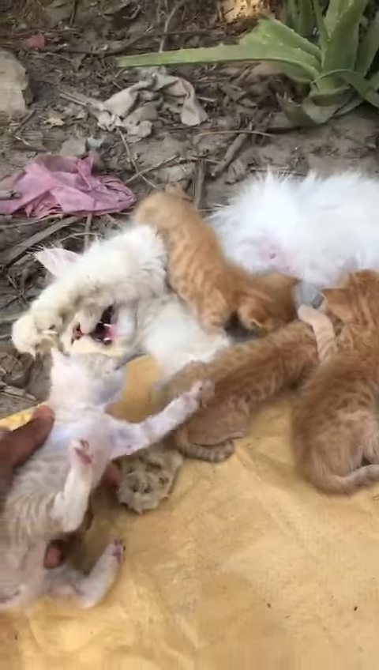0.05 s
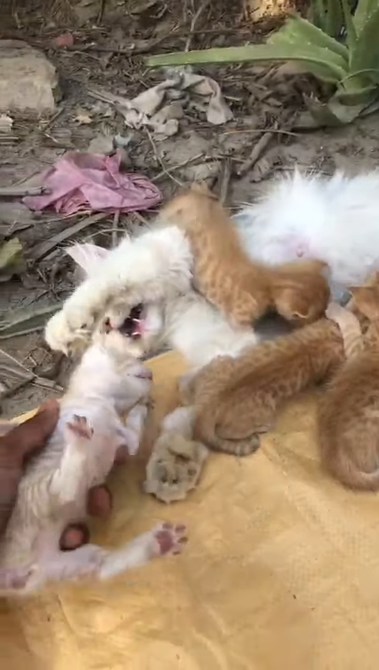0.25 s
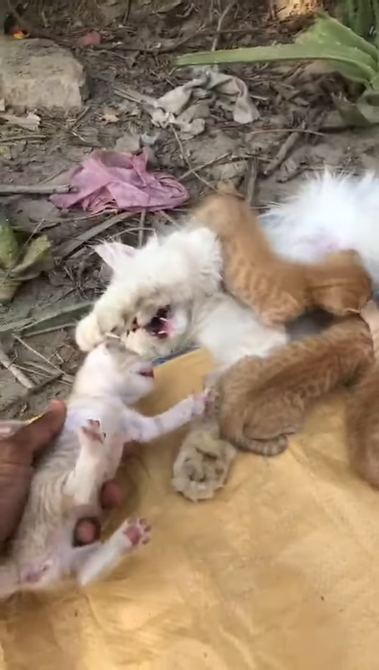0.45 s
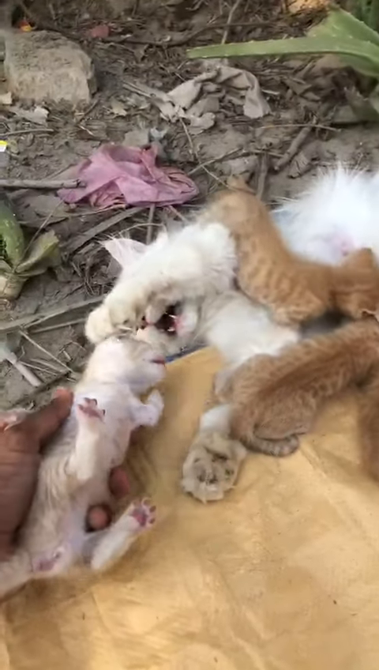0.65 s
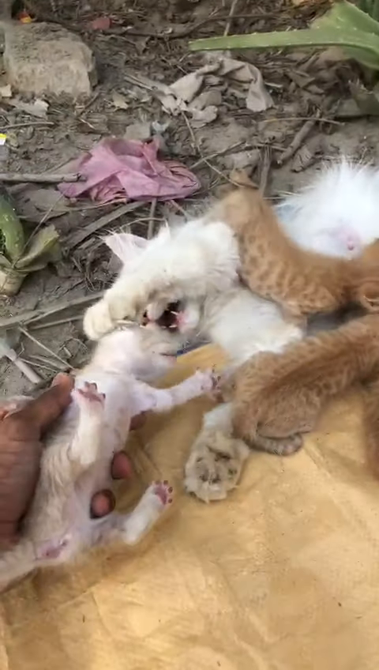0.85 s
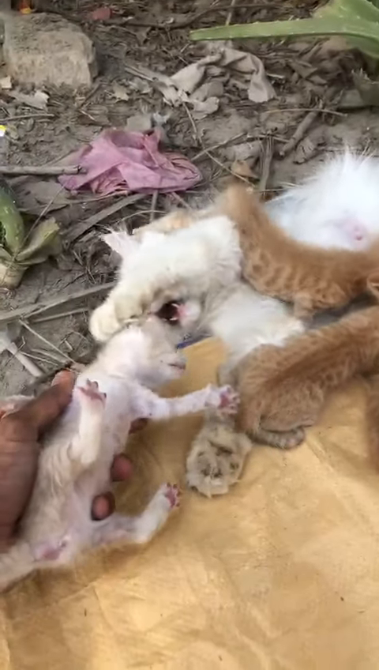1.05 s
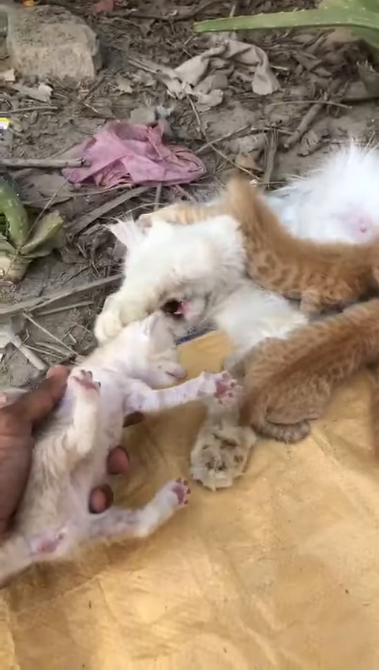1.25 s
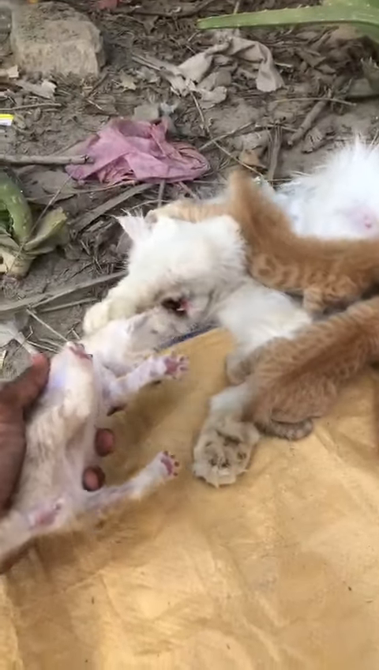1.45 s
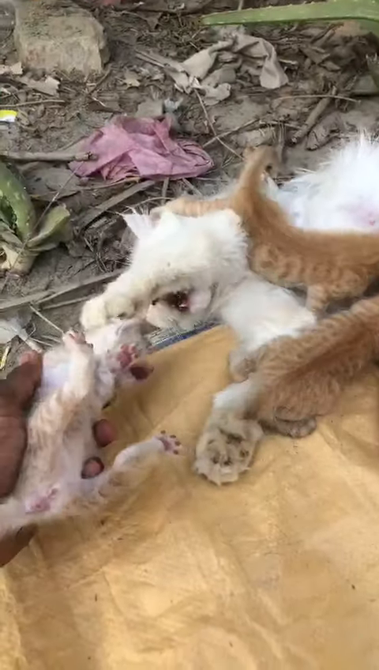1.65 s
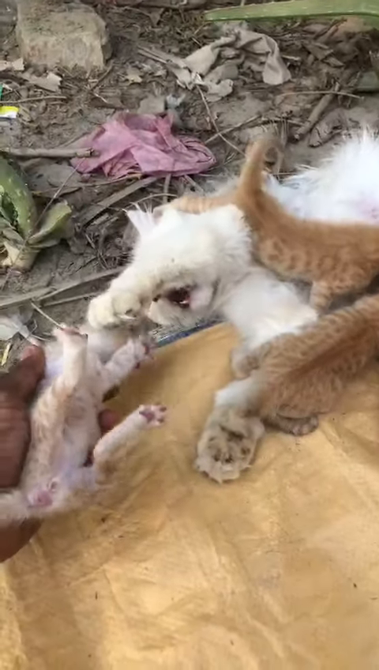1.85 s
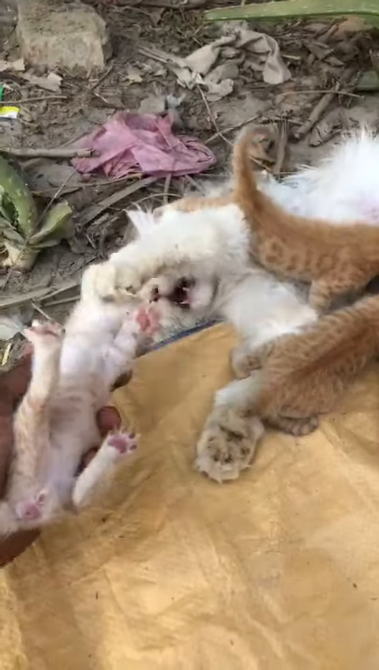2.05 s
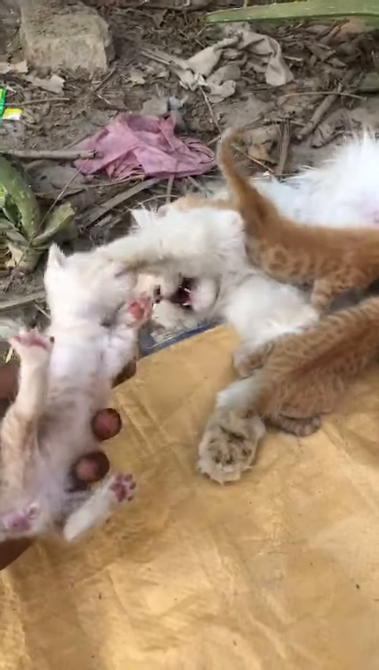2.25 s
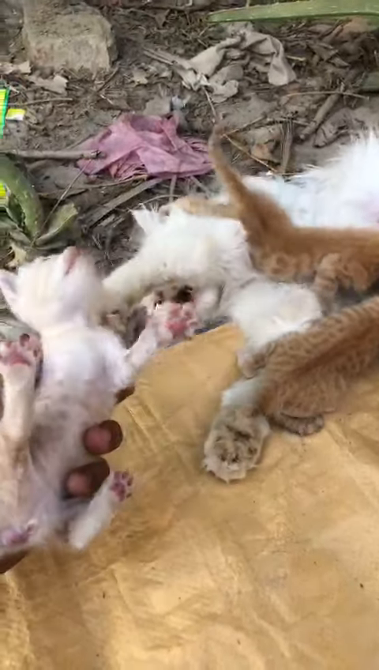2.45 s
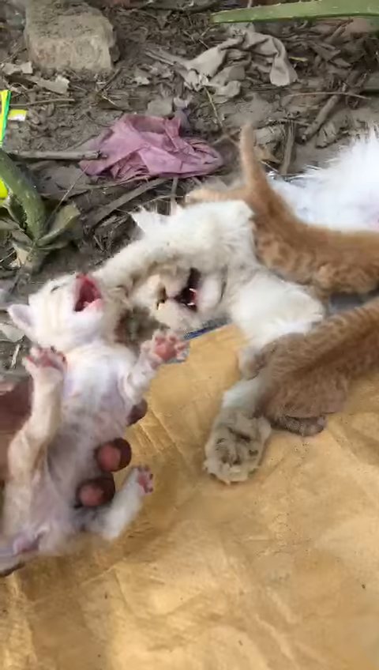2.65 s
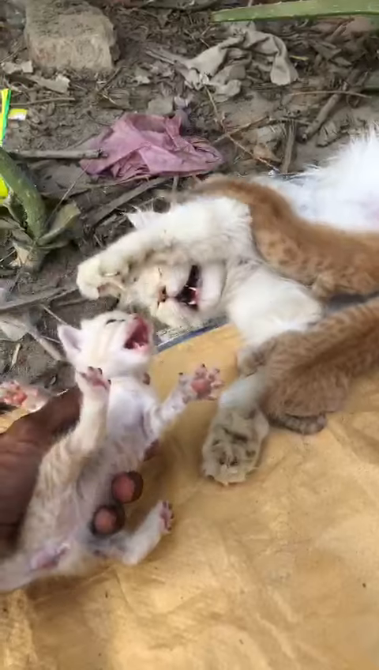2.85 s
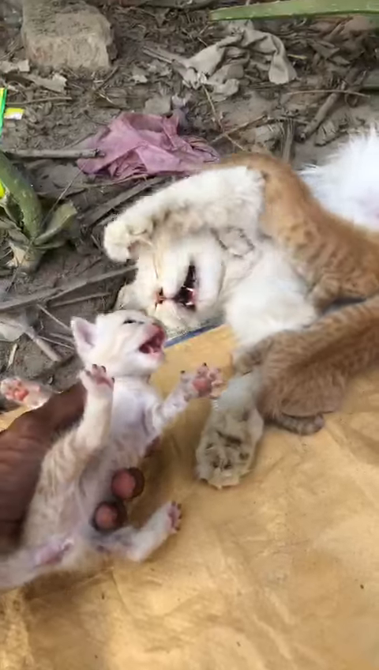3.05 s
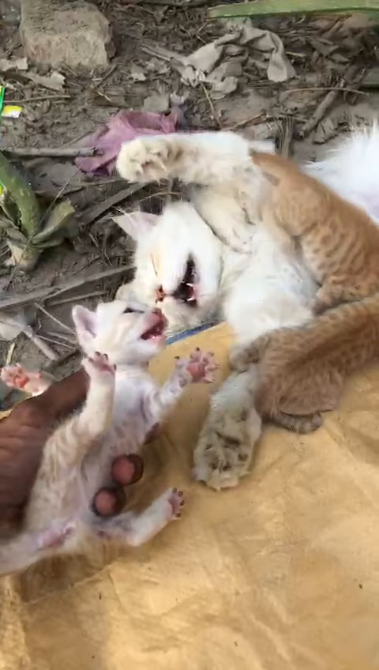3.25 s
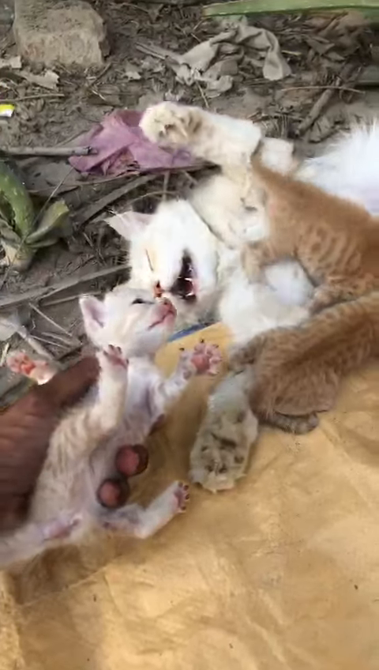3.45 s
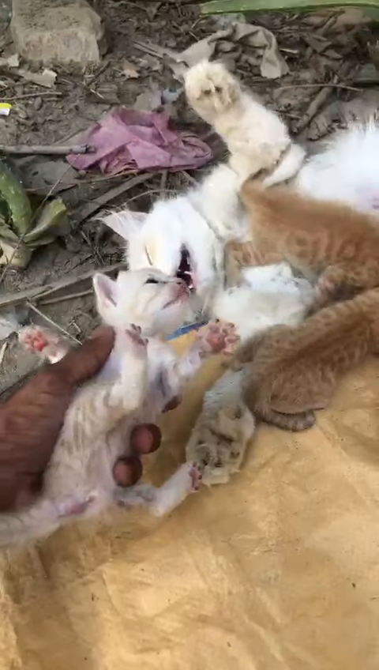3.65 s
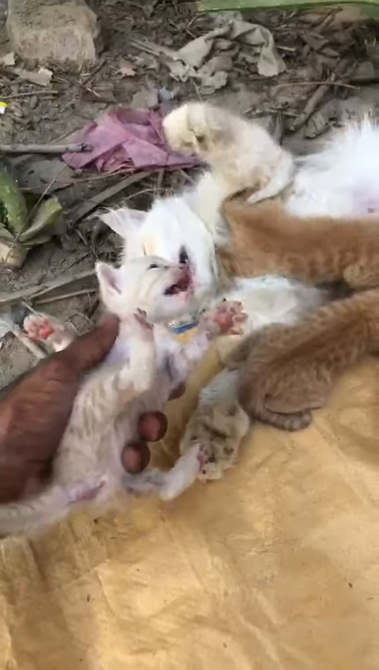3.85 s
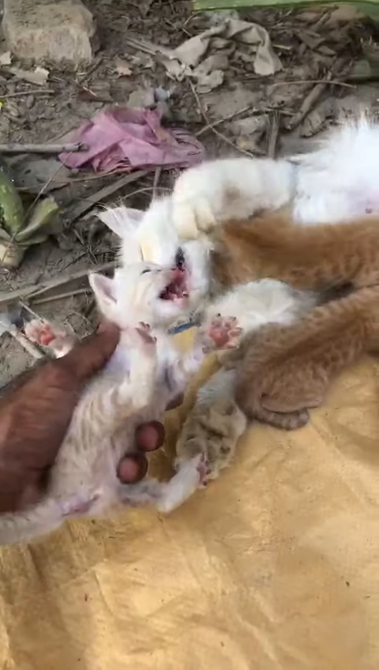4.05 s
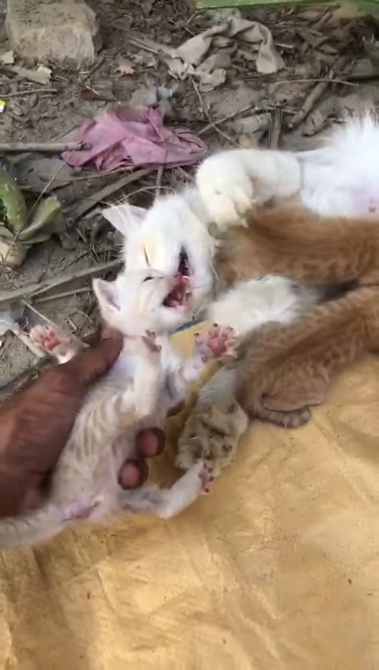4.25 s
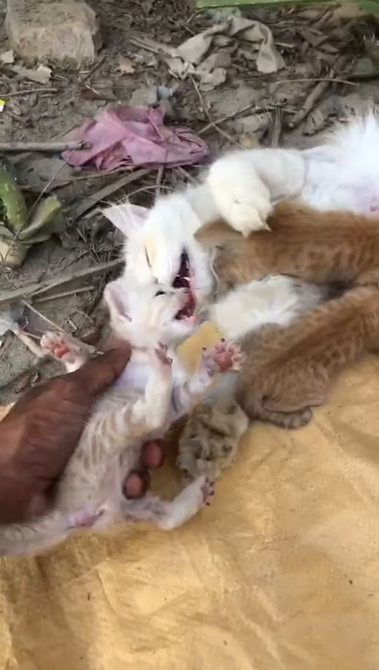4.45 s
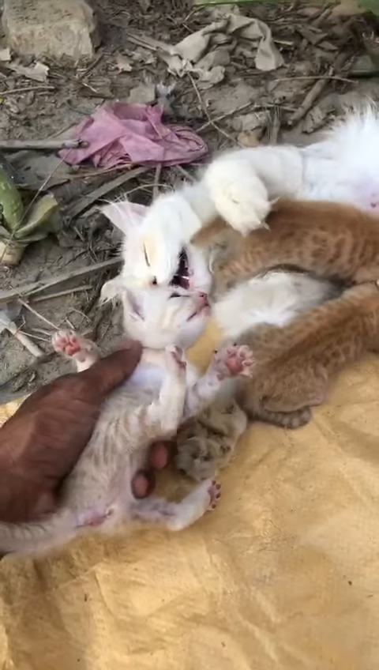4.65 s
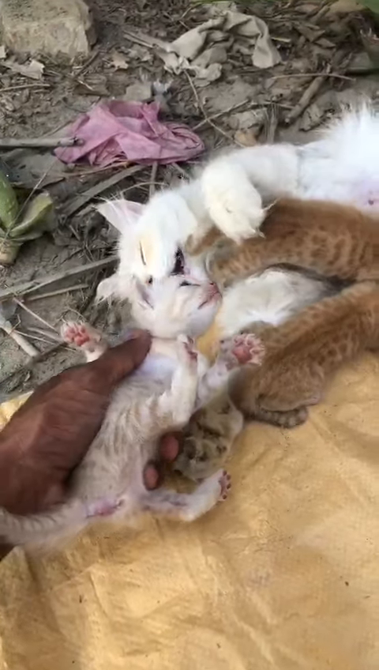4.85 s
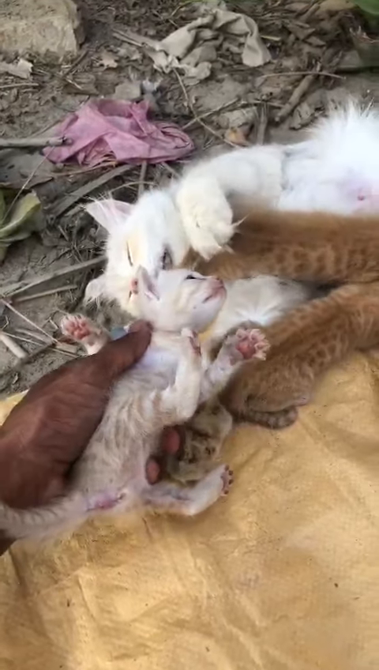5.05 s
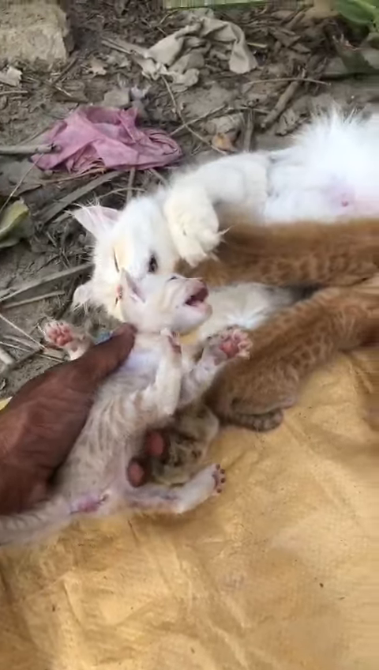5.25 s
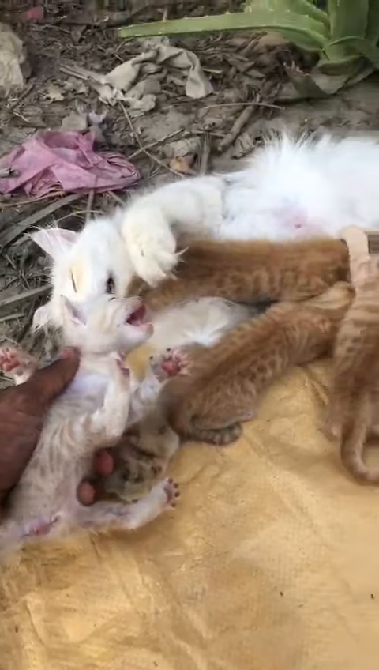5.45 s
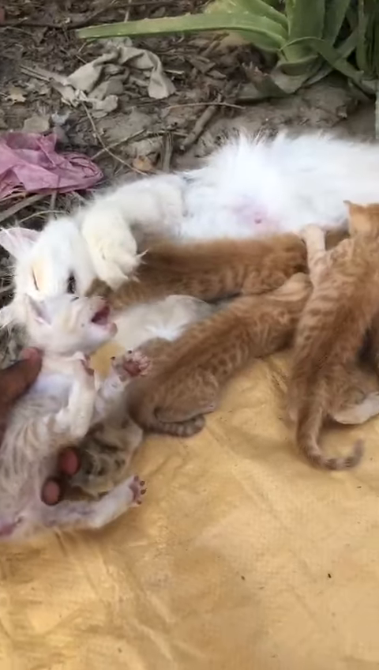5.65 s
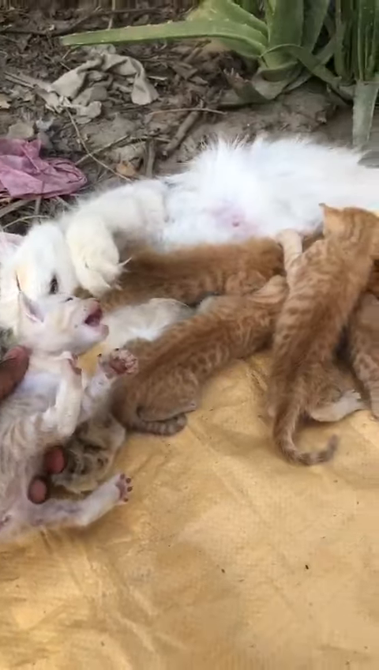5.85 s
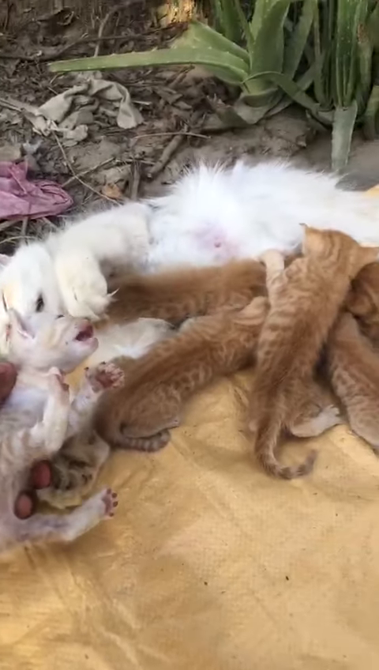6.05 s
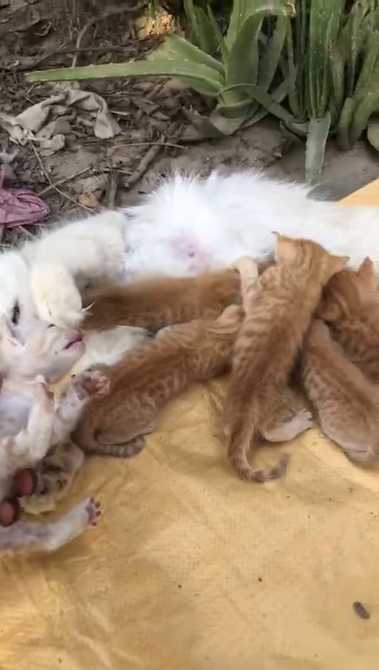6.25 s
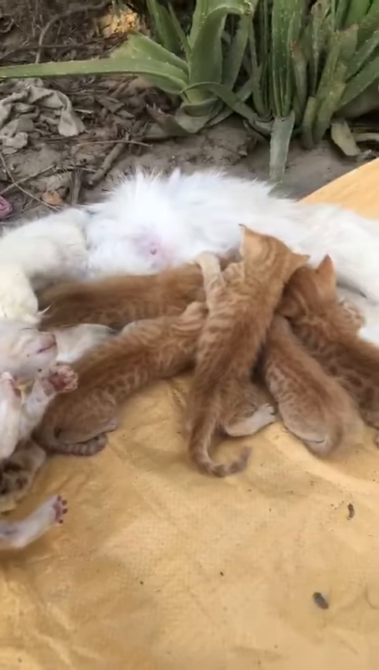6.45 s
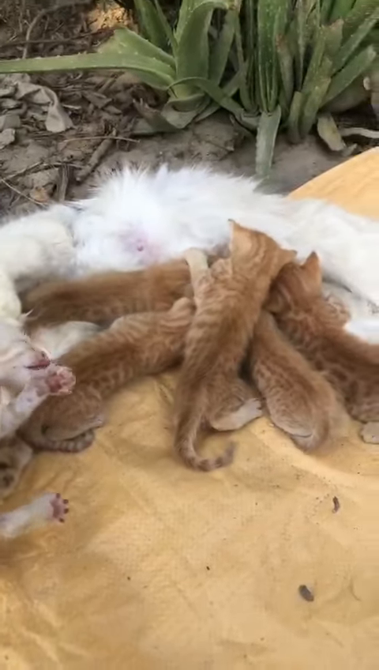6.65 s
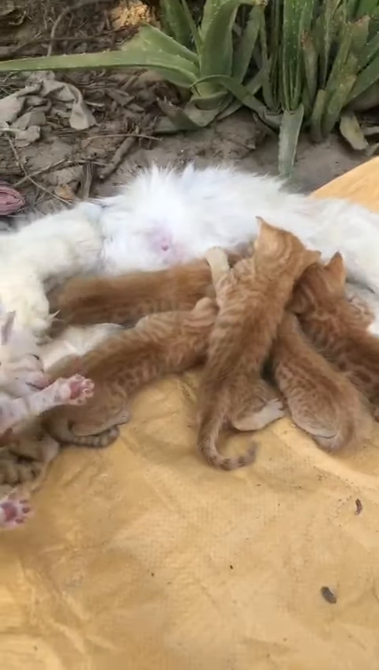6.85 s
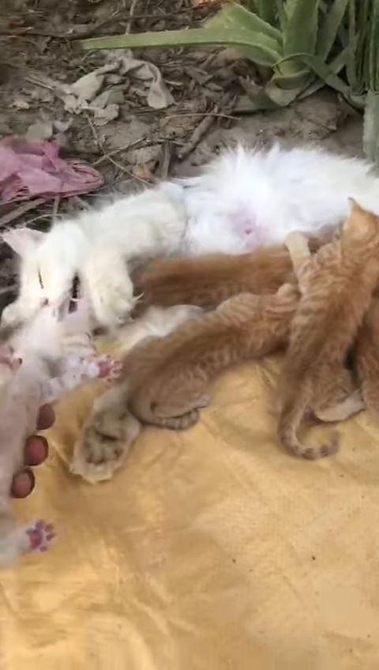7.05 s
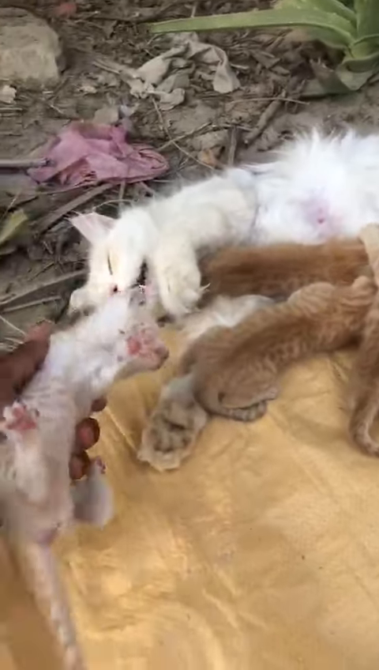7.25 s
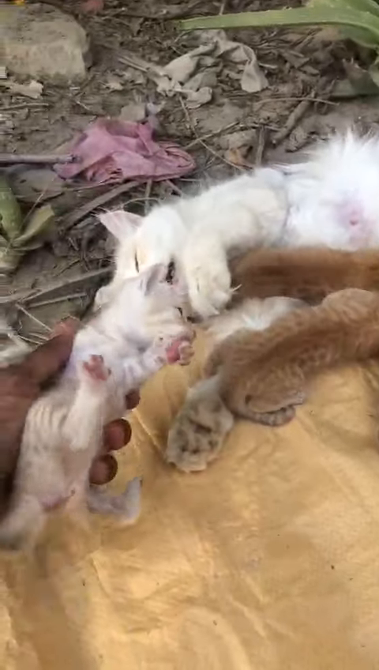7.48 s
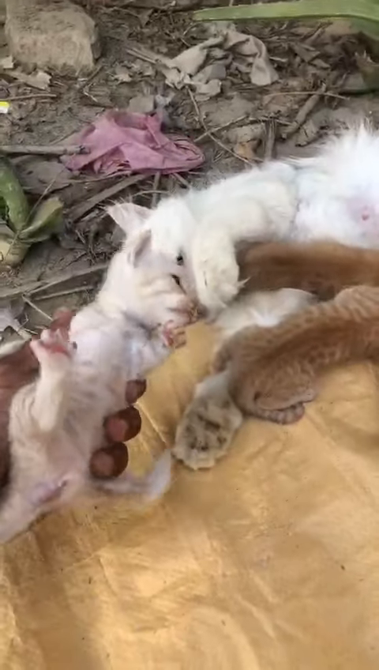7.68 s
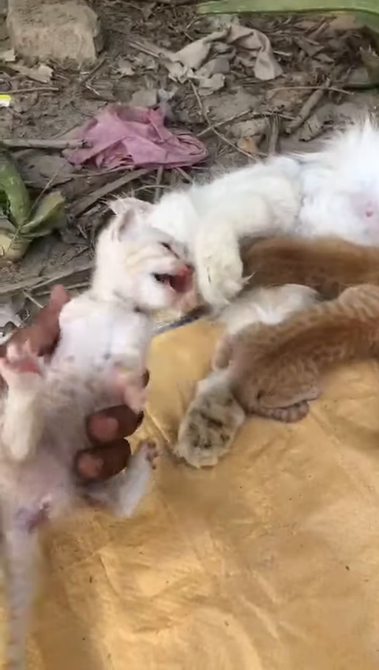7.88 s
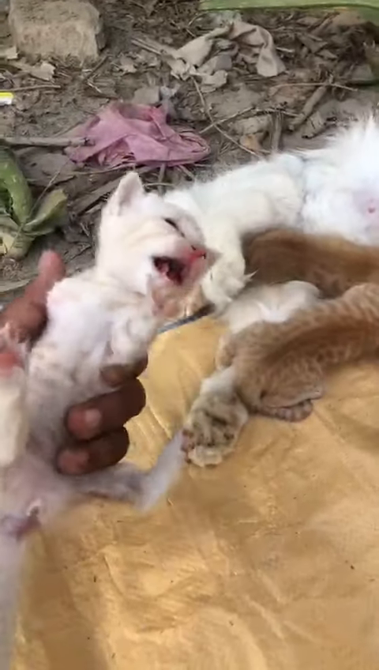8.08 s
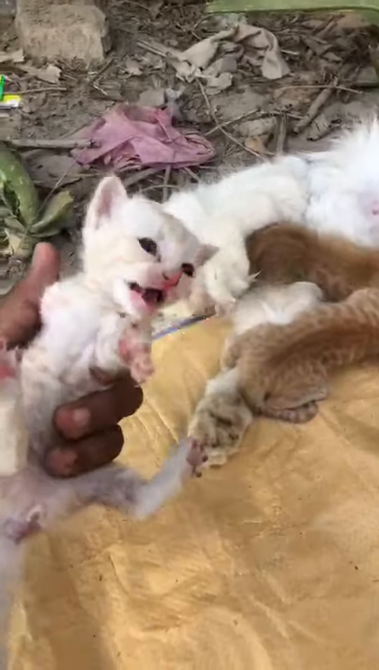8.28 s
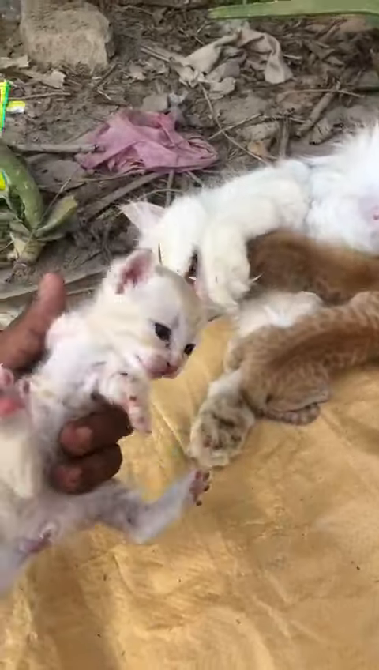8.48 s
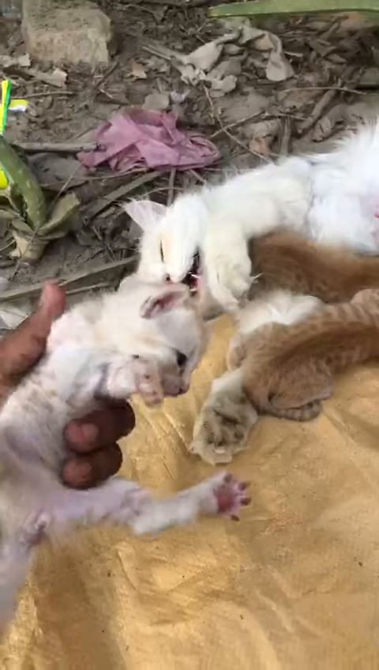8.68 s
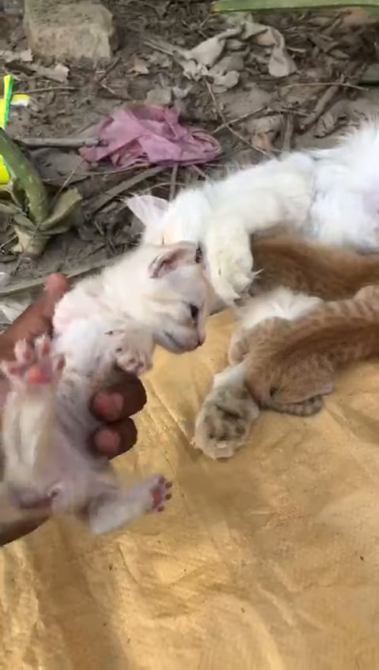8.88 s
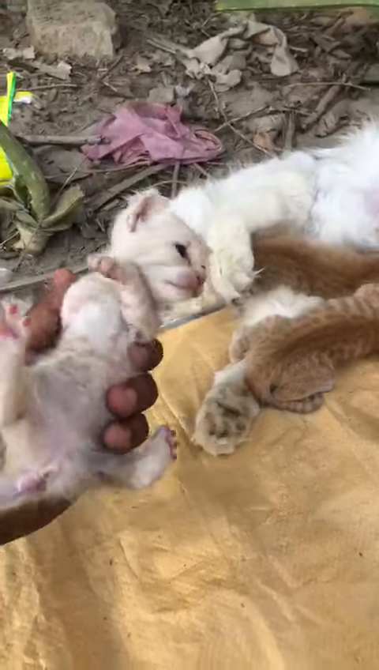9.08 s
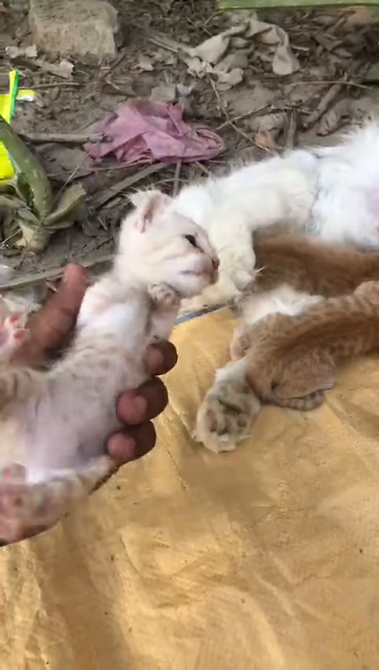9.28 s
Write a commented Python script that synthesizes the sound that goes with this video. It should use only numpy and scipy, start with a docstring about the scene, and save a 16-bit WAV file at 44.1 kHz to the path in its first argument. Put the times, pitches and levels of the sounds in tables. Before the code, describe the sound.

Short shrill kitten cries with pauses between, a small gulp, a litter mate's thin peep, light ticks and rustles in a quiet yard.

```python
"""A very young kitten, held in a hand outdoors, mews six times: arched harmonic tones under one mouth resonance.
The first three mews lead to a brief gulp-like blip, a gliding tone; in places the voice splits and rasps.
The fourth and fifth follow, a litter mate peeping thinly over the fifth's end; after a gap comes the sixth.
Throughout: shaped-noise air and a low sine hum; now and then damped ticks, small squeaks, noise-band
rustles and spells of a far insect."""
import sys
import numpy as np
from scipy import signal
from scipy.fft import rfft, irfft, next_fast_len
from scipy.io import wavfile
from scipy.ndimage import uniform_filter1d

SR = 44100
rng = np.random.default_rng(int(sys.argv[2]) if len(sys.argv) > 2 else 0)


def master(y):
    """Save y as 16-bit WAV."""
    cut = np.clip(np.atleast_2d(y).T, -1, 1)
    pcm = np.round(cut * 32767)  # scale
    wavfile.write(sys.argv[1], SR, pcm.astype(np.int16))


N = 411012

# course of each mew: t/s, aimed pitch f/Hz, effort level/dB, mouth resonance f/Hz
MEW_1 = [(0.185, 1022, -2, 1660), (0.295, 1127, -4.5, 1880), (0.323, 1213, 0.1, 3060),
         (0.352, 1170, -7.5, 1460), (0.393, 1278, -0.6, 1800), (0.411, 1249, -0.94, 2370),
         (0.484, 1227, -1.0, 2420), (0.556, 1163, -1.6, 2370), (0.597, 1209, -1, 2030),
         (0.747, 1100, -2.5, 1850), (0.834, 1030, 0.4, 1400)]
MEW_2 = [(1.525, 1024, 2.9, 4700), (1.609, 1204, 1.03, 4400), (1.694, 1226, 1.1, 4070),
         (1.732, 1099, 1.73, 4145), (1.798, 1111, 1.46, 3870), (1.874, 1153, -0.22, 3390),
         (1.966, 1115, 0.16, 3380), (2.028, 1106, -0.58, 3090), (2.086, 1066, -1.2, 2830),
         (2.193, 1100, -0.73, 2400)]
MEW_3 = [(2.503, 1165, -0.5, 3340), (2.604, 1191, -0.2, 3800), (2.698, 1223, -0.5, 4510),
         (2.795, 1221, -0.2, 4070), (2.923, 1185, -1.0, 3600), (3.078, 1169, -1.49, 3510),
         (3.188, 1122, -1.15, 3300), (3.234, 1147, -2.5, 3380), (3.384, 1036, -2, 2530)]
MEW_4 = [(3.88, 1120, 1.2, 3370), (3.964, 1174, -0.5, 4230), (4.046, 1157, 0.0, 4200),
         (4.131, 1160, 0.38, 4080), (4.212, 1161, 0.42, 3900), (4.307, 1192, -0.8, 3810),
         (4.431, 1160, -1.26, 3450), (4.534, 1109, -2, 3010), (4.608, 952, -2.5, 2350)]
MEW_5 = [(5.2, 1097, 1.5, 2370), (5.256, 1192, -0.2, 2280), (5.27, 1257, 1, 4220), (5.45, 1163, -0.5, 4390),
         (5.57, 1170, -1.43, 4270), (5.723, 1177, -2, 4000), (5.906, 1109, -3.5, 3460),
         (6.06, 1056, -3.0, 2914), (6.208, 1002, -3, 2320), (6.326, 967, -0.85, 2070)]
MEW_6 = [(7.797, 1035, 1.3, 2110), (7.855, 1155, -2, 2560), (7.888, 1120, -3.5, 2600),
         (7.925, 1197, -1.8, 3770), (7.952, 1145, -1.33, 3760), (8.01, 1181, -.5, 3910),
         (8.077, 1155, -0.5, 3540), (8.104, 1112, 0.6, 3116), (8.262, 1117, 0.76, 3070),
         (8.37, 1103, 0.26, 2753), (8.45, 1055, -0.8, 2270), (8.562, 953, 1.36, 2500)]


def amp(db):
    """Decibels to gain."""
    return 10 ** (np.asarray(db) / 20)


def unit(x):
    """Scales to rms 1."""
    return x / np.sqrt(np.mean(x ** 2) + 1e-20)


def read(points, hz):
    """Interpolates a (f/Hz, value) spectrum on a log-frequency axis."""
    f, value = np.transpose(points)
    return np.interp(np.log(hz + 1), np.log(f), value)


def add(mix, start_s, sound):
    """Mixes a sound in at start_s."""
    part = mix[max(round(start_s * SR), 0):][:len(sound)]
    part += sound[:len(part)]


def noise(size, colour):
    """Noise of rms 1 whose spectrum follows the gain colour(Hz)."""
    padded = next_fast_len(size + 2048)
    spectrum = rfft(rng.standard_normal(padded)) * colour(np.fft.rfftfreq(padded, 1 / SR))
    return unit(irfft(spectrum, padded)[:size])


def wander(size, rate_hz):
    """Random motion of rms 1, slower than about rate_hz."""
    return noise(size, lambda f: np.exp(-(f / rate_hz) ** 2))


def band(size, hz, octaves):
    """Noise of rms 1 in a bell-shaped band on a log-frequency axis."""
    return noise(size, lambda f: np.exp(-.5 * (np.log2((f + 1) / hz) / octaves) ** 2))


def fade(t, start, end, edge_s):
    """A gate from start to end with smooth edges."""
    ramp = np.clip(np.minimum(t - start, end - t) / edge_s, 0, 1)
    return np.sin(np.pi / 2 * ramp) ** 2


def mew(course, level_db, slope_db, tense_s, relax_s, strain_jitter=0.051, shimmer_db=0.67, side_db=-47,
        breath_db=-36, slip_hz=100, fits_db=3, split_waver_db=3, sheen_db=-71, sheen_rise_s=0.078):
    """Harmonics of the folds; under strain they repeat only every third cycle, and turbulence joins in."""
    jitter = .0018  # share of pitch
    upper_side_db, hiss_db = -9.5, -4
    hiss_resonance = 0.38  # share of the mouth resonance's dB height that turbulence feels
    start, end = course[0][0], course[-1][0]
    t = np.arange(start, end, 1 / SR)
    size = len(t)
    glide_hz, effort_db, mouth_hz = gesture(t, course, tense_s, relax_s)

    side, rasp = break_shares(t, side_db, breath_db)
    side = side * amp(split_waver_db * wander(size, 35))
    rasp = rasp * amp(fits_db * wander(size, 60))  # the rasp comes in fits

    pitch_hz = uniform_filter1d(glide_hz, size=500, mode="nearest")
    unsteadiness = jitter * wander(size, 67) + strain_jitter * rasp * wander(size, 350)
    pitch_hz = pitch_hz * (1 + unsteadiness)
    phase = 2 * np.pi * np.cumsum(pitch_hz) / SR

    # a second motion of the folds locks to a third of the pitch, and slips when the voice rasps
    slow_hz = pitch_hz / 3
    slipping_hz = slow_hz + slip_hz * rasp * wander(size, 120)
    slow_phase = 2 * np.pi * np.cumsum(slipping_hz) / SR

    # each overtone gets side tones below and above, coloured by the mouth at their own frequency
    family = [(-0.0022, 0.97), (-1, side), (1, side * amp(upper_side_db))]  # (step/slow_hz, gain)
    tone = np.zeros(size)
    for k in range(1, 14):
        shimmer = amp(shimmer_db * np.sqrt(k / 2) * wander(size, 22))
        members = family if k > 1 else family[:1]
        for step, share in members:
            gain = voice_gain(k * glide_hz + step * slow_hz, glide_hz, slope_db, effort_db, mouth_hz)
            tone += share * shimmer * gain * np.cos(k * phase + step * slow_phase - k ** 2 / 2)

    # closing folds snap: a thin sheen of high harmonics, independent of effort
    sheen = np.zeros(size)
    for k in range(6, 11):
        sheen += amp(sheen_db + shimmer_db * wander(size, 22)) * np.sin(k * phase - k ** 2 / 2)
    sheen = sheen * fade(t, start, end + sheen_rise_s / 2, sheen_rise_s)

    # turbulence passes the same mouth and pulses with the slow motion of the folds
    hz, at_s, z = signal.stft(rng.standard_normal(size), SR, nperseg=256)
    frame_pitch, frame_effort, frame_mouth = [np.interp(at_s + start, t, c)
                                              for c in (glide_hz, effort_db, mouth_hz)]
    z = z * voice_gain(hz[:, None], frame_pitch, slope_db, frame_effort, frame_mouth, hiss_resonance)
    hiss = signal.istft(z, SR, nperseg=256)[1][:size]
    hiss = hiss * np.sqrt(SR / 2 / pitch_hz) * (1 + .5 * np.cos(slow_phase))

    voice = amp(level_db) * (np.sqrt(2) * tone + amp(hiss_db) * rasp * hiss) + np.sqrt(2) * sheen
    return start, voice * fade(t, start, end, 0.0043)


def gesture(t, course, tense_s, relax_s):
    """Slack folds are flat and weak: they tense up to the course and go slack at the end."""
    scoop, attack_db = .232, 9  # share of pitch and effort missing at the start
    drop, release_db = .251, 6  # the same at the end
    s, *columns = np.transpose(course)
    aim_hz, effort_db, mouth_hz = [np.interp(t, s, c) for c in columns]
    starting = np.exp((t[0] - t) / tense_s)
    ending = np.exp((t - t[-1]) / relax_s)
    pitch_hz = aim_hz * (1 - scoop * starting) * (1 - drop * ending)
    return pitch_hz, effort_db - attack_db * starting - release_db * ending, mouth_hz


def break_shares(t, side_db, breath_db, last_rasp_db=0, last_s=0.0204):
    """Gains of side tones and rasp: breaks rasp least in their middle; every mew rasps as it ends."""
    settle_db = 6  # for breaks of 0.17 s or more
    # voice breaks: start t/s, end t/s, side tone re harmonic level/dB, rasp before settling level/dB
    breaks = [(0.323, .344, -29, -4.5), (1.71, 1.728, -27.5, -20), (1.75, 1.83, -37, -38),
              (2.837, 2.93, -12, -11), (2.918, 3.097, -6.5, -15.5), (3.134, 3.173, -25, -17),
              (4.017, 4.09, -9.5, -6.5), (4.058, 4.297, -8, -16.5), (5.429, 5.56, -4.5, -13),
              (8.102, 8.115, -43.5, -19.5), (8.377, 8.462, -29, -23), (8.458, 8.54, -29, -17.5)]
    side = np.full(len(t), amp(side_db))
    rasp = np.full(len(t), amp(breath_db))
    for start, end, split_db, rasp_db in breaks:
        inside = (t >= start) & (t < end)
        middle = np.sin(np.pi * (t[inside] - start) / (end - start)) ** 2
        side[inside] = amp(split_db)
        rasp[inside] = amp(rasp_db - settle_db * middle * min((end - start) / 0.17, 1))
    rasp[t > t[-1] - last_s] = amp(last_rasp_db)
    return uniform_filter1d(np.array([side, rasp]), size=400, axis=1)


def voice_gain(hz, pitch_hz, slope_db, effort_db, mouth_hz, resonance=1):
    """Gain of the voice at hz: slope of the folds, mouth resonance and throat."""
    mouth_peak_db, mouth_width_hz = 26.5, 316
    brighten, top_harmonic = 3.03, 8.1  # dB per octave per dB of effort; slope stops at top_harmonic
    # fixed colour of the throat: f/Hz, level/dB
    throat = [(400, -14), (800, 0), (1200, 0), (2300, 5.4), (3400, 2.5), (4600, 2.6), (5600, 2),
              (7000, 2.5), (9000, -9), (10500, -9), (11700, -15), (13000, -24)]
    octaves = np.log2(np.clip(hz / pitch_hz, 1, top_harmonic))
    folds_db = effort_db + (slope_db + brighten * effort_db) * octaves
    mouth_db = resonance * mouth_peak_db / np.hypot(1, (hz - mouth_hz) / mouth_width_hz)
    return amp(folds_db + mouth_db + read(throat, hz))


def last_flap(course, db=-49, hz=780, length_s=0.015):
    """The slack folds flap a few more times, low and dull, as the mew stops."""
    t = np.arange(0, length_s, 1 / SR)
    flap = np.sin(2 * np.pi * hz * t) * np.sin(np.pi * t / length_s)
    return course[-1][0] - length_s / 2, amp(db) * flap


def puff(course, db=-65, hz=6700, length_s=0.12, octaves=0.067, wide_db=-5, wide_octaves=0.43):
    """The folds part at the end of a mew and the kitten's last air hisses out."""
    t = np.arange(0, length_s, 1 / SR)
    hiss = band(len(t), hz, octaves) + amp(wide_db) * band(len(t), hz, wide_octaves)
    hiss = hiss * np.sin(np.pi * t / length_s) ** 2
    return course[-1][0] - length_s / 2, amp(db) * unit(hiss)


def hand_echo(x, share=0.54, delay_s=.0016, sway_s=.00008):
    """Treble glances off the moving hand; interference makes the upper harmonics swell and dip."""
    treble = signal.sosfilt(signal.butter(2, 5000, "highpass", fs=SR, output="sos"), x)
    late = np.arange(N) - SR * (delay_s + sway_s * wander(N, 3.3))
    return x + share * np.interp(late, np.arange(N), treble)


def peep(rows, overtone_db, jitter=0.0047):
    """A nearly pure gliding tone with a weak octave."""
    s, hz, db = np.transpose(rows)
    t = np.arange(s[0], s[-1], 1 / SR)
    pitch_hz = np.interp(t, s, hz) * (1 + jitter * wander(len(t), 120))
    phase = 2 * np.pi * np.cumsum(pitch_hz) / SR
    tone = np.sin(phase) + amp(overtone_db) * np.sin(2 * phase)
    return s[0], np.sqrt(2) * amp(np.interp(t, s, db)) * tone * fade(t, s[0], s[-1], 0.00084)


def squeak(start, end, first_hz, last_hz, db, swell_db=7):
    """A small peep that swells and fades while its pitch sags."""
    rows = [(start, first_hz, db - swell_db),
            ((start + end) / 2, (first_hz + last_hz) / 2, db),
            (end, last_hz, db - swell_db)]
    return peep(rows, overtone_db=-12)


def tick(start, peak_db, hz, length_s, crack=0.2):
    """One heavily damped ring with a little crackle."""
    t = np.arange(0, .03, 1 / SR)
    ring = np.sin(2 * np.pi * hz * t) + crack * band(len(t), 2 * hz, 1.07)
    click = ring * t * np.exp(-2 * t / length_s) / length_s
    click = click + 0.012 * band(len(t), hz, 1) * np.exp(-t / 0.0039)
    return start, amp(peak_db) * click / abs(click).max()


def rustle(start, end, db, hz, octaves, grain_db=3.0):
    """Rubbing as a gated band of noise with random grain in its level."""
    t = np.arange(start, end, 1 / SR)
    grains = band(len(t), hz, octaves) * amp(grain_db * wander(len(t), 320))
    return start, amp(db) * unit(grains) * fade(t, start, end, 0.0075)


def insect(start, end):
    """A far insect's buzz: a grainy, very narrow band of noise."""
    return rustle(start, end, db=-77.5, hz=8730, octaves=0.02)


def yard(x, wet_db=-29, t60_s=0.27):
    """Faint scatter from ground and plants: a decaying noise tail."""
    t = np.arange(0, .5, 1 / SR)
    tail = band(len(t), 3500, 1.0) * amp(-60 * t / t60_s) * (t > .004)
    return x + amp(wet_db) * signal.fftconvolve(x, tail / np.linalg.norm(tail))[:N]


def background(air_db=-56.65, swell_db=0.2, hum_waver=0.01278):
    """Outdoor air as shaped noise; a distant motor as sines wavering together in pitch."""
    # relative air spectrum: f/Hz, level/dB
    air_colour = [(15, -49), (25, -11.5), (60, -2), (134, -3.5), (169, -5.5), (231, -5.5), (331, -12.5),
                  (1030, -21.5), (2130, -24), (7940, -34), (8800, -35.5), (12000, -42), (15600, -89),
                  (22000, -120)]
    # motor partials: f/Hz, peak level/dB
    hum_partials = [(70, -61.5), (140, -61.5), (210, -63)]
    air = noise(N, lambda f: amp(read(air_colour, f))) * amp(air_db + swell_db * wander(N, 3.6))
    warped_s = np.cumsum(1 + hum_waver * wander(N, 5.02)) / SR
    hum = sum(amp(db + 0.87 * wander(N, 5)) * np.sin(2 * np.pi * hz * warped_s)
              for hz, db in hum_partials)
    return air + hum


def scene():
    """All sources in the open yard."""
    # mews: course, level/dB, spectral slope/(dB/octave), tensing time/s, relaxing time/s
    mews = [(MEW_1, -60.2, -1.65, 0.028, .031), (MEW_2, -55, 0.12, 0.075, 0.023),
            (MEW_3, -51, 1.72, 0.091, .017), (MEW_4, -53.5, 0.27, .028, 0.00844),
            (MEW_5, -56.5, 5.2, 0.098, .063), (MEW_6, -49.5, 1.1, .049, .048)]
    # litter mate's thin peep: t/s, f/Hz, level/dB
    litter_mate = [(5.94, 927, -49.5), (6.0, 951, -50), (6.08, 1076, -46), (6.18, 1131, -46.2),
                   (6.29, 1132, -44.5), (6.41, 1045, -44), (6.52, 996, -48.5)]
    # gulp-like blip: t/s, f/Hz, level/dB
    blip = [(3.562, 530, -54), (3.568, 530, -35), (3.58, 554, -37), (3.59, 394, -38.5), (3.603, 355, -50)]
    # faint squeaks and far cries: start t/s, end t/s, first f/Hz, last f/Hz, mid level/dB
    squeaks = [(1.259, 1.304, 780, 586, -51.5), (2.304, 2.504, 1070, 1027, -66),
               (7.879, 8.201, 940, 935, -61), (8.64, 8.77, 3075, 3010, -57.5),
               (8.718, 8.77, 2420, 2350, -57.5), (9.12, 9.155, 1285, 1180, -50)]
    # small dry ticks: t/s, peak level/dB, centre f/Hz, length/s
    ticks = [(0.292, -48, 3800, 0.00086), (1.529, -42, 1510, 0.0006), (2.52, -45, 1100, .001),
             (1.217, -50, 5000, 0.00085), (3.884, -36, 1700, 0.00078), (4.809, -44, 2290, 0.00083),
             (4.865, -43, 2560, 0.00055), (4.928, -44, 4540, .0007), (5.117, -48, 2820, .0006),
             (5.245, -43.5, 8850, 0.0019), (7.285, -22, 1670, 0.00059), (7.955, -44, 895, .002)]
    # rubbing of fur and hand: start t/s, end t/s, level/dB, centre f/Hz, width/octave
    rustles = [(0.175, 0.472, -63.5, 476, 0.48), (3.584, 3.677, -66.5, 4500, 0.91),
               (3.616, 3.67, -57.5, 450, 0.95), (8.566, 8.671, -63.5, 3525, 0.15),
               (9.108, 9.302, -58.5, 1100, 1.27), (9.139, 9.292, -51.5, 266, 0.1)]
    # insect spells: start t/s, end t/s
    insect_spells = [(0, 0.38), (3.351, 3.7), (6.297, 7.05)]
    near = np.zeros(N)
    for course, *manner in mews:
        add(near, *mew(course, *manner))
        add(near, *last_flap(course))
        add(near, *puff(course))
    near = hand_echo(near)
    add(near, *peep(litter_mate, overtone_db=-26.0))
    add(near, *peep(blip, overtone_db=-24.5))
    for source, rows in [(squeak, squeaks), (tick, ticks), (rustle, rustles), (insect, insect_spells)]:
        for row in rows:
            add(near, *source(*row))
    return (yard(near) + background())[None]


def record(dry, low_cut_hz=36, edge_hz=12250):
    """The small microphone loses the deep bass; then a steep low-pass limits the band."""
    thinned = signal.sosfilt(signal.butter(2, low_cut_hz, "highpass", fs=SR, output="sos"), dry)
    low_pass = signal.firwin(401, edge_hz, window=("kaiser", 9), fs=SR)
    return signal.oaconvolve(thinned, low_pass[None], "same")


dry = scene()
out = record(dry)
master(out)
```